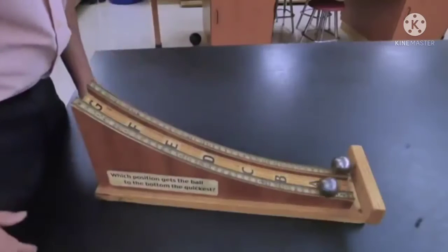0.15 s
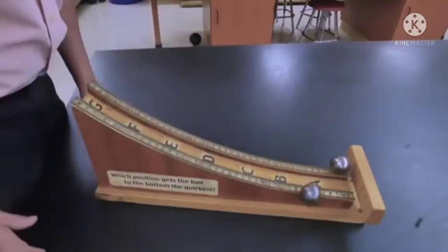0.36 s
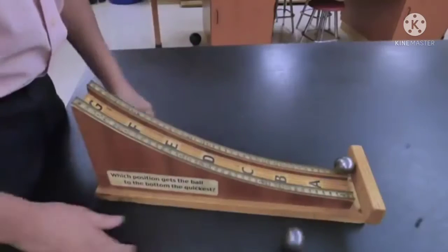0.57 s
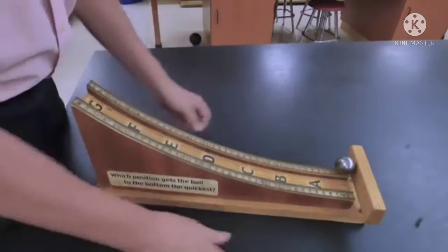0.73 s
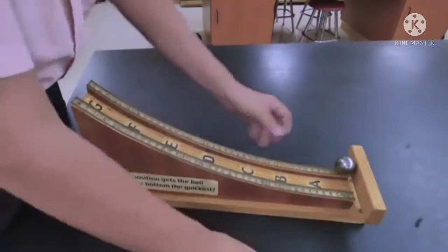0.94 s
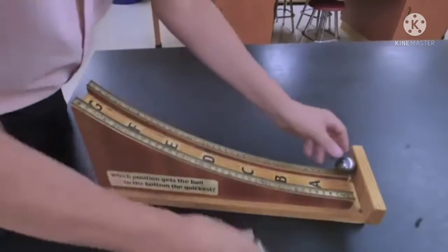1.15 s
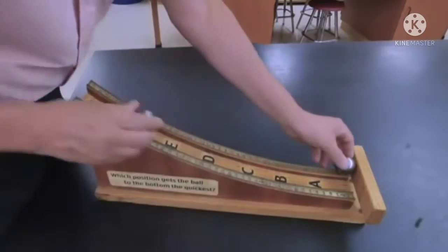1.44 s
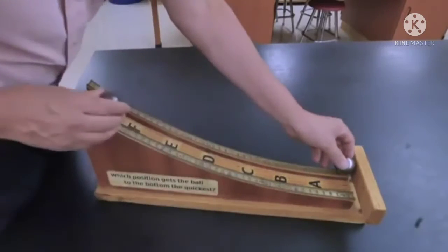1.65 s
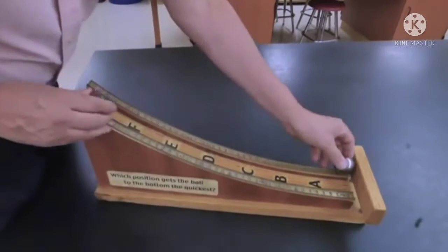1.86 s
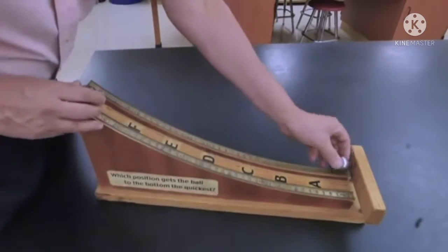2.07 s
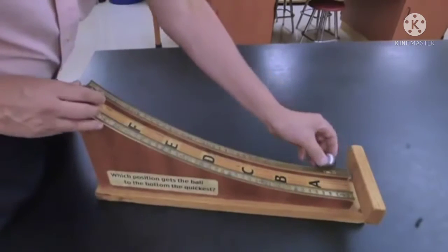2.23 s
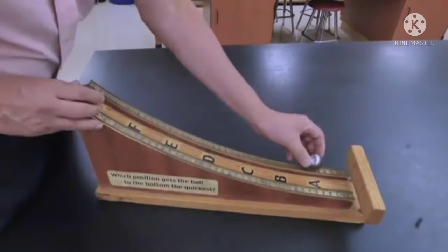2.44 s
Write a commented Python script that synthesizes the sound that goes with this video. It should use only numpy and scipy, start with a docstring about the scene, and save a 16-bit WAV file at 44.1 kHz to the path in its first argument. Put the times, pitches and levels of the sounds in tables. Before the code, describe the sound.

A steel ball rumbles and ticks down a wooden ramp, striking the end stop with a loud woody knock at 0.15 s. It rattles back until about 0.4 s, drops on a hard table at 0.55 s with a sharp crack, then bounces at 0.67, 0.75 and 0.79 s, quickening and fading by about 1 s. Quiet hiss and low hum remain; faint wooden taps and lens ticking come from 1.95 to 2.6 s.

```python
"""A steel ball rolls down a wooden ramp, knocks the end stop, rattles back along the rails, drops on a hard table
and bounces to rest in a classroom. Later a hand sets a ball on the ramp and nudges it along.
Random bumps excite ramp and table-top resonances, single blows ring the ramp;
table landings are decaying sines with a noisy crack.
Behind them the camera hisses, its lens motor ticks faintly, and its limiter ducks the loud blows."""
import sys
import numpy as np
from scipy import signal
from scipy.fft import rfft, irfft, next_fast_len
from scipy.io import wavfile
from scipy.ndimage import uniform_filter1d

SR = 44100
rng = np.random.default_rng(int(sys.argv[2]) if len(sys.argv) > 2 else 0)


def inscribe(sig):
    """Save sig as 16-bit PCM at rate SR to the path in sys.argv[1].

    A 1-D sig is mono; a 2-D sig holds one channel per row.
    Samples are clipped to [-1, 1] before scaling.
    """
    pcm = np.round(np.clip(np.atleast_2d(sig).T, -1, 1) * 32767)
    wavfile.write(sys.argv[1], SR, pcm.astype(np.int16))


def gain_from_db(level_db):
    """Convert decibel levels to linear amplitude factors (20 dB per decade)."""
    decades = np.asarray(level_db, float) / 20
    return 10 ** decades


N = 114660  # samples

# Main resonances of the wooden ramp. Each row: centre in Hz, width in Hz, relative level in dB.
RAMP_UPPER = [(595, 55, 1), (651.6, 44, 0), (770, 38, 2.5), (937, 60, -4), (1075.6, 59, -6),
              (1447, 18, 2.5), (1540, 150, -7), (1649, 60, -4), (1820, 33, -10.5), (2200, 70, -7),
              (2326, 210, -10.5), (3100, 900, -8), (3780, 83, -0.5)]
# Bass resonances of the ramp. Each row: centre in Hz, width in Hz, relative level in dB.
RAMP_LOW = [(185, 20, -9), (220.7, 17, -7), (271, 53, -1), (289, 30, 3), (348, 42, 1.5), (400, 150, -2.5),
            (450, 62, -10.5)]


def unit(x):
    """Scaled to rms 1."""
    return x / np.sqrt(np.mean(x ** 2) + 1e-20)


def along(points, hz):
    """Reads a curve of (Hz, value) points on a log frequency axis."""
    f, v = np.transpose(points)
    return np.interp(np.log(hz + 1), np.log(f + 1), v)


def filtered(x, response):
    """Sound shaped by a complex response of frequency."""
    m = next_fast_len(x.shape[-1] + SR // 2)
    spectrum = rfft(x, m) * response(np.fft.rfftfreq(m, 1 / SR))
    return irfft(spectrum, m)[..., :x.shape[-1]]


def band(f, hz, width_hz):
    """Response of one causal resonance."""
    return 1j * f * width_hz / (hz * hz - f * f + 1j * f * width_hz)


def soft(f, hz):
    """Two-pole low-pass: a lower corner means a softer contact."""
    return 1 / (1 + 1j * f / hz) ** 2


def resonances(f, modes):
    """Sum of a body's resonances, with alternating sign."""
    return sum((-1) ** k * gain_from_db(db) * band(f, hz, width) for k, (hz, width, db) in enumerate(modes))


def pair(z, likeness):
    """Two unrelated signals mixed to a left-right likeness that varies with frequency."""
    def mid_side_gains(hz):
        angle = np.arccos(np.clip(along(likeness, hz), -1, 1)) / 2
        return np.array([np.cos(angle), np.sin(angle)])

    mid, side = filtered(z, mid_side_gains)
    return np.array([mid + side, mid - side])


def add(track, s, sound):
    """Mixes a sound in at a time in seconds."""
    i = round(s * SR)
    track[..., i:i + sound.shape[-1]] += sound[..., :max(track.shape[-1] - i, 0)]


def burst(t60, response):
    """A short puff of coloured noise that falls 60 dB in t60 seconds."""
    t = np.arange(SR // 10) / SR
    return unit(filtered(rng.standard_normal(len(t)), response)) * gain_from_db(-60 * t / t60) / 2


def struck(points):
    """A click with a given spectrum and nothing before its start (minimum phase), peak 1."""
    size = 8192
    cepstrum = irfft(np.log(gain_from_db(along(points, np.fft.rfftfreq(size, 1 / SR))) + 1e-6), size)
    # folding the cepstrum forward in time packs the energy at the start
    cepstrum[1:size // 2] *= 2
    cepstrum[size // 2 + 1:] = 0
    click = irfft(np.exp(rfft(cepstrum)), size)[:SR // 10]
    return click / np.abs(click).max()


def background():
    """Low room hum and hiss: two bands of steady coloured noise, partly alike left and right."""
    # Noise spectra. Each row: frequency in Hz, relative level in dB per Hz.
    hum_colour = [(15, -33.5), (30, -14), (90, -14), (162, 1.5), (206, -7.5), (240, 0), (422, -19),
                  (476, -27), (1180, -17.5), (1500, -29.5), (1950, -61.5), (3300, -120)]
    hiss_colour = [(350, -25), (600, -2), (1190, -16.5), (1520, -12), (1640, -9), (9030, -17.5),
                   (15600, -21)]
    # Stereo width of the noise. Each row: frequency in Hz, left-right likeness.
    noise_likeness = [(60, .6), (180, 1), (550, 0.64), (1650, 0.37), (5000, 0.22), (15000, .6)]
    hum_db, hiss_db = -56.5, -63.5

    def noise(colour):
        raw = filtered(rng.standard_normal((2, N)), lambda f: gain_from_db(along(colour, f)))
        return unit(pair(raw, noise_likeness))

    return gain_from_db(hum_db) * noise(hum_colour) + gain_from_db(hiss_db) * noise(hiss_colour)


def lens_motor():
    """Faint regular pips of narrow noise in runs, and a thin steady whine."""
    # Motor runs. Each row: start in seconds, end in seconds, mean pip level in dB.
    runs = [(1.111, 1.23, -62.5), (1.93, 1.93, -59), (1.947, 1.955, -59), (2.078, 2.6, -54.5)]
    whine_hz, whine_db = 8850, -80
    ticks_per_s, tick_s, jitter_s, spread_db = 29.8, 0.007, 0.00084, 2.5
    out = gain_from_db(whine_db) * np.sin(2 * np.pi * whine_hz * np.arange(N) / SR)
    length = round(tick_s * SR)

    def colour(f):
        return band(f, 4663, 160) ** 2 + .4 * band(f, 2650, 300) ** 2 + .7 * band(f, 1200, 250) ** 2

    for start, end, db in runs:
        for s in np.arange(start, end, 1 / ticks_per_s):
            # the last part of a longer noise, where the resonances have built up
            pip = unit(filtered(rng.standard_normal(SR // 20), colour)[-length:])
            when = s + rng.normal(0, jitter_s)
            add(out, when, gain_from_db(db + rng.normal(0, spread_db)) * pip * np.hanning(length))
    return out


def room(x, wet_db, walls_db):
    """Dry sound, a few near walls and a tail in which each frequency dies at its own speed."""
    # Tail decay. Each row: frequency in Hz, time to fall 60 dB in seconds.
    decay = [(150, 0.56), (500, 0.4), (1200, 0.39), (3000, 0.39), (6000, 0.25), (12000, .2)]
    # Tail width. Each row: frequency in Hz, left-right likeness.
    tail_likeness = [(60, 0.17), (180, 1), (550, 0.99), (1650, 0.78), (4970, 0.73), (15000, 0.17)]
    # Tail tone. Each row: frequency in Hz, relative level in dB.
    tail_colour = [(60, -27.5), (130, -6), (400, 8), (1000, 2), (3000, -3.5), (6000, 0), (12000, 4.5)]
    # Early reflections. Each row: delay in seconds, relative level in dB.
    reflections = [(.0014, -6), (.0032, -6), (.0055, -6), (.0075, -4.5), (.0095, -5), (0.013, -12.5),
                   (0.018, -7), (0.022, -23)]
    scatter_s, wall_top_hz, fade_in_s = .00015, 3500, 0.0049
    hz, t, z = signal.stft(rng.standard_normal((2, SR * 3 // 4)), SR, nperseg=256)
    tail = signal.istft(z * gain_from_db(-60 * t / along(decay, hz)[:, None]), SR, nperseg=256)[1]
    fade_in = np.minimum(np.arange(tail.shape[1]) / SR / fade_in_s, 1)
    tail = tail / np.linalg.norm(tail[0]) * fade_in
    tail = filtered(tail, lambda f: gain_from_db(along(tail_colour, f)))
    response = pair(tail, tail_likeness) * gain_from_db(wet_db)
    response[:, 0] += 1  # the direct sound
    smear = filtered(np.eye(1, 64)[0], lambda f: soft(f, wall_top_hz))
    for k, (s, db) in enumerate(reflections):
        for ear in response:
            add(ear, s + rng.uniform(0, scatter_s), (-1) ** k * gain_from_db(db + walls_db) * smear)
    return signal.fftconvolve(x[None], response, axes=1)


def rolling():
    """Random bumps under the ball shake the ramp and the table top; the rails hiss."""
    # Passages of rolling. Each row: time in seconds, then rms levels in dB of the deepest tones,
    # of the rumble, of the upper wood tones and of the rail hiss.
    passages = [
        [(0.0, -41, -26, -26.5, -35), (0.09, -40, -32.5, -33, -31), (0.164, -37, -24.5, -32, -28.5),
         (0.234, -38.5, -44, -32.5, -54.5), (0.348, -41, -31.5, -46.5, -46.5), (0.395, -41, -40, -42, -61.5),
         (0.43, -45.5, -50.5, -54, -60.5), (0.54, -49.5, -53.5, -69, -57.5)],
        [(1.96, -56, -78, -63, -65), (2.01, -50, -71, -64, -59.5), (2.136, -49.5, -54, -59, -65),
         (2.37, -60, -62, -67.5, -72), (2.41, -43, -51, -57.5, -61.5), (2.465, -54.5, -52, -60.5, -67.5),
         (2.495, -44, -63, -59, -55.5), (2.535, -48.5, -60, -67, -69), (2.555, -54, -61, -59, -54),
         (2.6, -52, -66, -70, -87)],
    ]
    # Deep table-top resonances under the rolling ball.
    # Each row: centre in Hz, width in Hz, relative level in dB.
    table_top_modes = [(122.9, 34, -3.5), (157, 53, -0.5)]
    # Rail hiss spectrum. Each row: frequency in Hz, relative level in dB per Hz.
    hiss_curve = [(880, -34.5), (1500, 2), (1950, -4), (3510, -2.5), (6430, -9.5), (8210, -24),
                  (9330, -16.5), (15500, -37.5)]
    bumps_per_s, spread_db, bump_share = 900, -3, .6
    t, out = np.arange(N) / SR, np.zeros(N)
    hits = rng.random(N) < bumps_per_s / SR
    bumps = hits * rng.standard_normal(N) * gain_from_db(spread_db * rng.standard_normal(N))
    deep = filtered(bumps, lambda f: resonances(f, table_top_modes) * soft(f, 450))
    rumble = filtered(bumps, lambda f: resonances(f, RAMP_LOW) * soft(f, 600))
    upper = filtered(bumps, lambda f: resonances(f, RAMP_UPPER) * soft(f, 2200))
    friction = rng.standard_normal(N) + bump_share * unit(bumps)
    hiss = filtered(friction, lambda f: gain_from_db(along(hiss_curve, f)))
    layers = [unit(x) for x in (deep, rumble, upper, hiss)]
    for rows in passages:
        s, *levels = np.transpose(rows)
        for layer, db in zip(layers, levels):
            out += layer * gain_from_db(np.interp(t, s, db, -120, -120))  # near silence outside the passage
    return out


def skips():
    """The ball skips on the rails: bright ticks of steel with an equally strong knock of wood, and a rattle."""
    # Skips. Each row: time in seconds, level of the lower click in dB, of the upper click in dB.
    marked = [(0.0297, -27, -38), (0.063, -21, -37), (0.0896, -16.5, -32.5), (0.1272, -16, -22),
              (0.204, -14, -24.5), (0.2144, -28.5, -40), (0.2404, -21, -38), (0.276, -17, -32),
              (0.3099, -19, -40), (0.3215, -29, -38.5), (0.337, -19, -47.5), (0.359, -23, -49),
              (0.3753, -27, -46.5)]
    t60_s, rattles, rattle_db = .028, 14, -26
    times = rng.uniform(.05, 0.12, rattles)  # s
    spread = rng.standard_normal((rattles, 2))
    small = [(s, rattle_db + 3 * a, rattle_db - 16 + 3 * b) for s, (a, b) in zip(times, spread)]
    out = np.zeros(N)
    for s, low_db, high_db in marked + small:
        tick = burst(t60_s, lambda f: band(f, 4200, 3800) ** 2)
        push = burst(0.0022, np.ones_like)
        body = filtered(push, lambda f: resonances(f, RAMP_UPPER) * band(f, 1500, 700))
        body = unit(body) * np.std(tick)  # wood as strong as the lower click
        high = burst(t60_s, lambda f: band(f, 10300, 7000) ** 2)
        add(out, s, gain_from_db(low_db) * (tick + body) + gain_from_db(high_db) * high)
    return out


def knocks():
    """Each blow rings the part of the wood's modes near its own centres, and clicks."""
    # Blows on the ramp. Each row: time in seconds, bass ring level in dB, its centre in Hz,
    # upper ring level in dB, its centre in Hz, click level in dB, its centre in Hz.
    blows = [(0.1405, -24, 365, -10.5, 774.4, -27.5, 3500), (0.1468, -19, 325, 0.5, 1480, -13, 3500),
             (0.1502, -15, 320, 2.5, 998, -9, 2900), (1.9724, -26.5, 390, -29, 1500, -25.5, 4770),
             (1.99, -27, 300, -58, 1450, -59, 2200), (2.0006, -56, 365, -38, 1670, -60, 2200),
             (2.0108, -54.5, 326, -37, 1450, -42.5, 4200), (2.028, -27.5, 270, -54, 1400, -63.5, 2980),
             (2.1649, -26.5, 314, -33, 1320, -29.5, 4127), (2.3916, -35.5, 400, -35.5, 1740, -41, 5370),
             (2.4192, -43.5, 282, -50, 2220, -64, 2500), (2.4771, -41.5, 287, -38.5, 1700, -42, 3730),
             (2.483, -51, 260, -43, 1700, -59, 3950), (2.5431, -46.5, 303, -45, 2700, -47.5, 2900)]
    # Rail resonances in the click. Each row: centre in Hz, width in Hz, relative level in dB.
    rail_modes = [(2180, 220, 2.5), (2900, 320, -1), (3660, 220, -1), (4340, 660, -1), (4840, 260, 1.5),
                  (5864, 400, 1.5), (7300, 4700, -7), (11490, 3500, -9.5)]
    bass_width_hz, click_t60_s = 59, .04
    ring_width, click_width = 0.62, .9  # as shares of their centres
    out = np.zeros(N)

    def peak(x):
        return x / np.abs(x).max()

    for s, bass_db, bass_hz, upper_db, upper_hz, click_db, click_hz in blows:
        push = np.pad(burst(0.0005, np.ones_like), (0, SR // 5))
        push[0] += 3  # a sharp first contact
        bass = filtered(push, lambda f: resonances(f, RAMP_LOW) * band(f, bass_hz, bass_width_hz))
        upper = filtered(push, lambda f: resonances(f, RAMP_UPPER) * band(f, upper_hz, ring_width * upper_hz))
        add(out, s, gain_from_db(bass_db) * peak(bass) + gain_from_db(upper_db) * peak(upper))
        click = burst(click_t60_s,
                      lambda f: resonances(f, rail_modes) * band(f, click_hz, click_width * click_hz))
        add(out, s, gain_from_db(click_db) * click)
    return out


def bounces():
    """Landings on the table ring its modes and crack; they grow weaker, and each fills the room anew."""
    # First landings. Each row: time in seconds, level in dB, hardness as a low-pass corner in Hz.
    landings = [(.5489, 13, 11000), (.6700, 9, 9000), (.7455, 6, 7000), (.7943, 3.5, 7500),
                (.8268, -2, 4000), (.8502, -5, 2800)]
    # Table modes. Each row: frequency in Hz, relative level in dB, time to fall 60 dB in seconds.
    table_modes = [(171.4, -27, 0.12), (310.3, -21.5, 0.067), (410.4, -18.5, 0.06), (770, -2, 0.043),
                   (961, -16.5, 0.032), (1107, -8.5, 0.026), (1447, -15.5, 0.088), (1949, -9.5, 0.026),
                   (2310, -15.5, 0.054), (2521, -13, 0.041), (3017, -17, 0.12), (3500, -5, 0.021),
                   (4280, -14.5, 0.062)]
    # Crack spectrum. Each row: frequency in Hz, relative level in dB per Hz.
    crack_curve = [(40, -68.5), (120, -38), (200, -18), (814, 11), (1920, 7), (2560, 6.5), (3830, 0.5),
                   (6620, -17.5), (12300, -31.5), (15600, -34)]
    shrink, loss_db, dulling = 0.84, 9, 0.56  # per later bounce: flight time, level, corner
    crack_db, grit_db, grit_t60_s, mode_spread_db = 2, -1, .006, 1.9
    out, t = np.zeros((2, N)), np.arange(SR // 10) / SR
    (before, *_), (last, last_db, last_hz) = landings[-2:]
    more = np.arange(1, 8)
    later_s = last + (last - before) * np.cumsum(shrink ** more)
    later = zip(later_s, last_db - loss_db * more, last_hz * dulling ** more)
    for s, blow_db, contact_hz in [*landings, *later]:
        ring = np.zeros(len(t))
        for hz, db, t60 in table_modes:
            ring += gain_from_db(db + rng.normal(0, mode_spread_db) - 60 * t / t60) * np.sin(2 * np.pi * hz * t) / 4
        crack = gain_from_db(crack_db) * struck(crack_curve)
        grit = gain_from_db(grit_db) * burst(grit_t60_s, lambda f: gain_from_db(along(crack_curve, f)))
        blow = filtered(ring + crack + grit, lambda f: soft(f, contact_hz)) * gain_from_db(blow_db)
        add(out, s, room(blow, wet_db=3, walls_db=3))
    return out


def scene():
    """Everything at the microphone."""
    ramp = room(rolling() + knocks() + skips(), wet_db=-10, walls_db=-9)[:, :N]
    return ramp + bounces() + lens_motor() + background()


def top_cut(x):
    """Nothing passes above the cut-off."""
    return signal.sosfilt(signal.butter(12, 15730, fs=SR, output="sos"), x)


def record(dry):
    """Microphone colour; a limiter that ducks a little late and recovers at a steady rate; soft clipping."""
    dip, dip_hz, dip_width_hz, bass_hz, top_hz = 0.92, 504, 35, 80, 15700
    ceiling_db, attack_s, release_db_per_s, clip_hard = -1.5, 0.0054, 93, 4
    x = filtered(dry, lambda f: 1 - dip * band(f, dip_hz, dip_width_hz))
    need_db = np.minimum(ceiling_db - 20 * np.log10(np.abs(x).max(0) + 1e-9), 0)
    climb_db = release_db_per_s * np.arange(N) / SR
    # the gain drops at once where needed, then climbs steadily
    gain_db = np.minimum.accumulate(need_db - climb_db) + climb_db
    # averaging over the past makes it late
    late = max(round(attack_s * SR), 2)
    x = x * gain_from_db(uniform_filter1d(gain_db, late, origin=(late - 1) // 2))
    x = x / (1 + np.abs(x / gain_from_db(ceiling_db)) ** clip_hard) ** (1 / clip_hard)
    mix = filtered(x, lambda f: (1j * f / (bass_hz + 1j * f)) ** 2 * (f < top_hz))
    return top_cut(mix)


dry = scene()
out = record(dry)
inscribe(out)
```